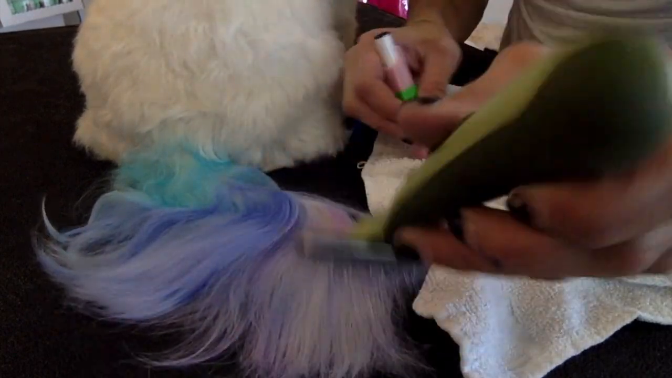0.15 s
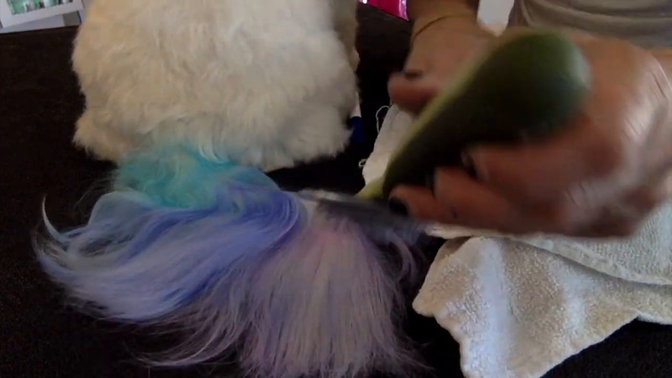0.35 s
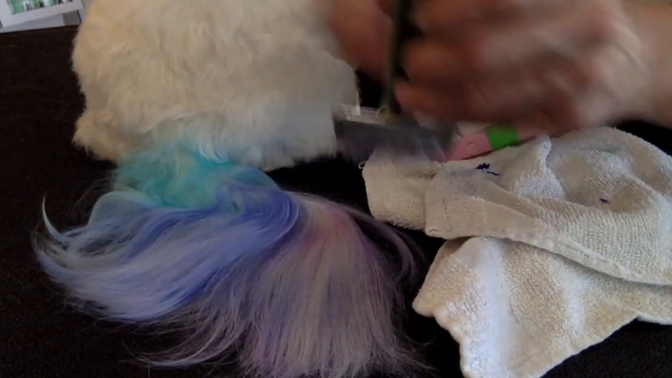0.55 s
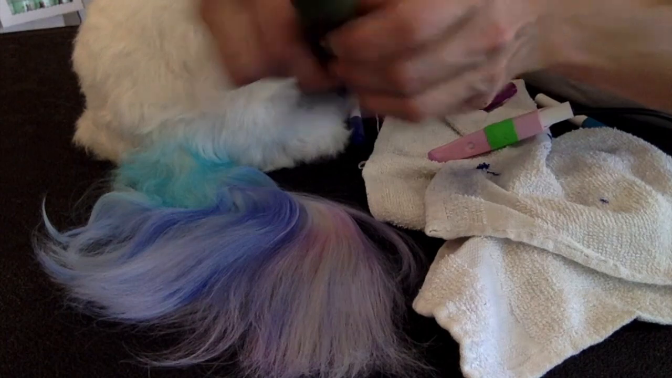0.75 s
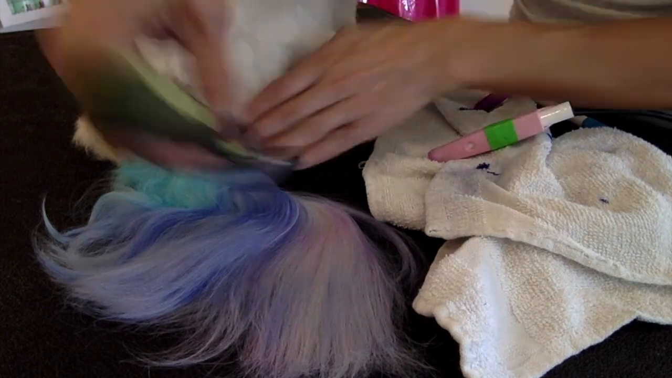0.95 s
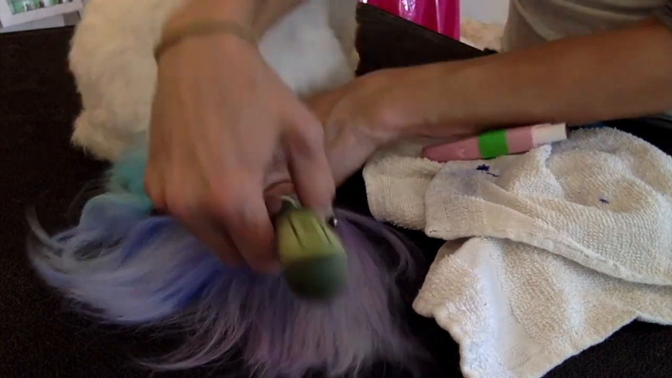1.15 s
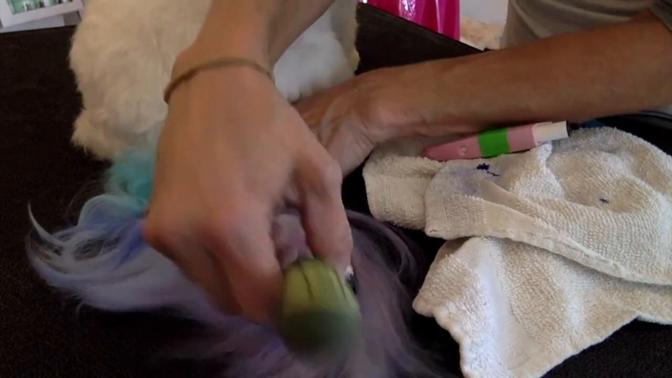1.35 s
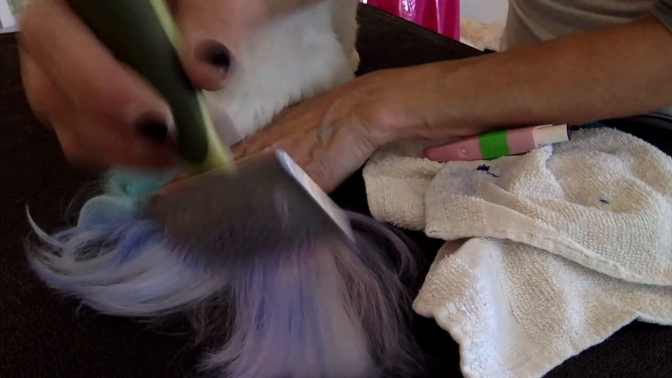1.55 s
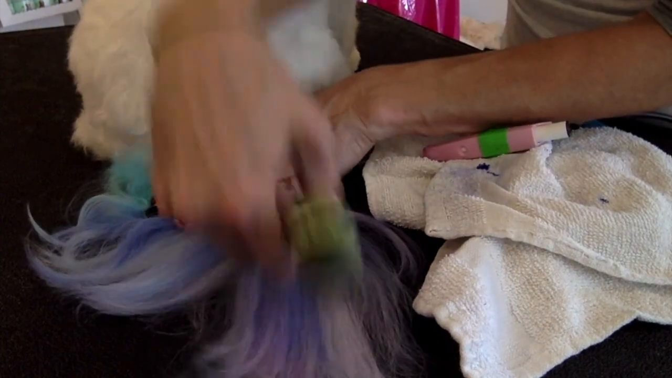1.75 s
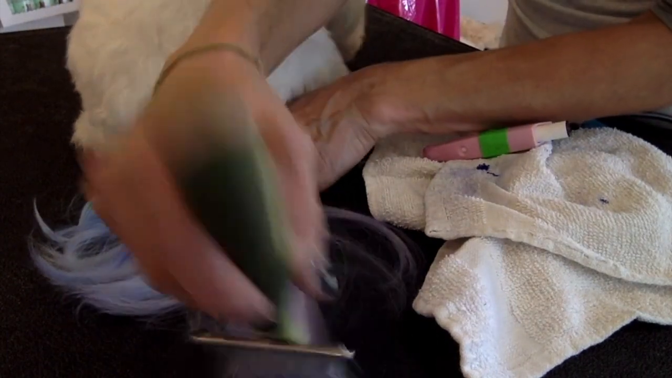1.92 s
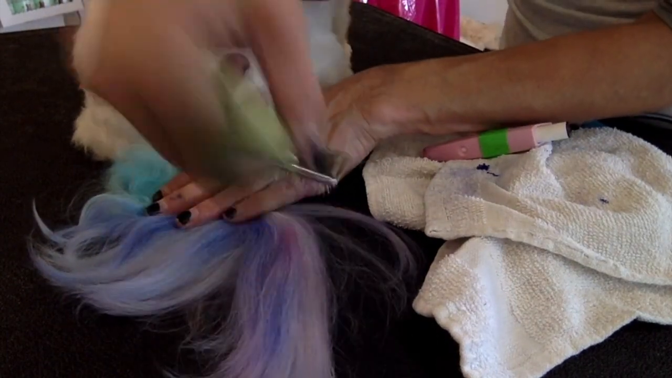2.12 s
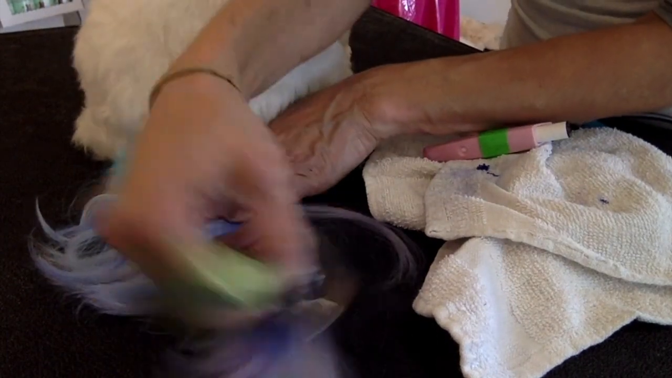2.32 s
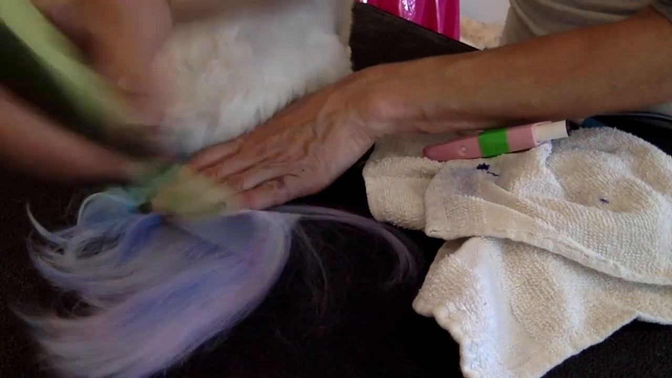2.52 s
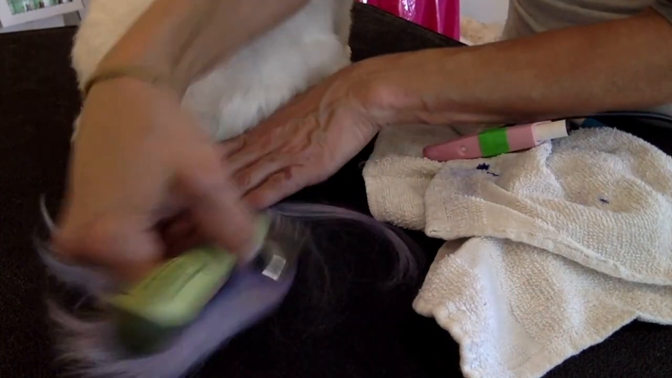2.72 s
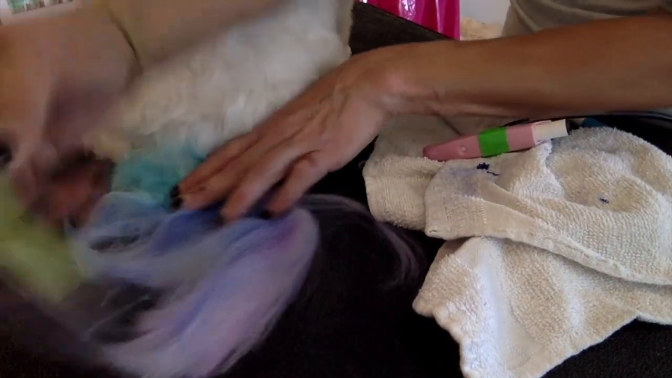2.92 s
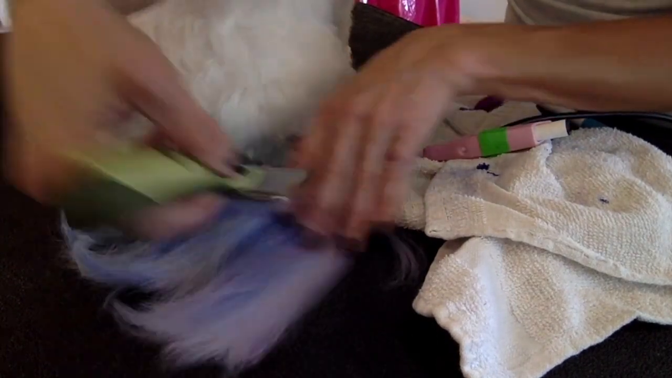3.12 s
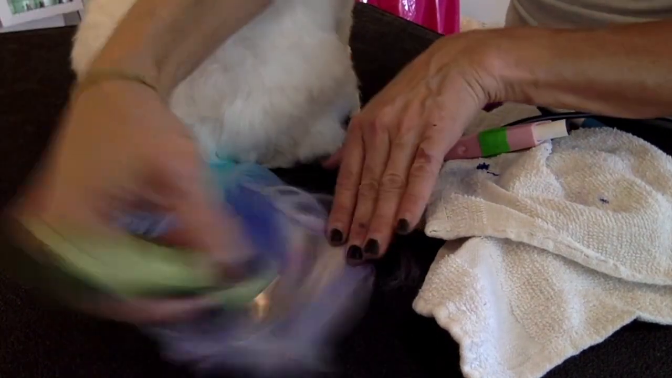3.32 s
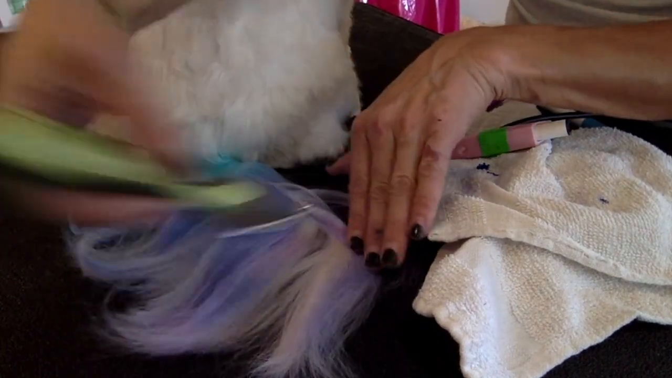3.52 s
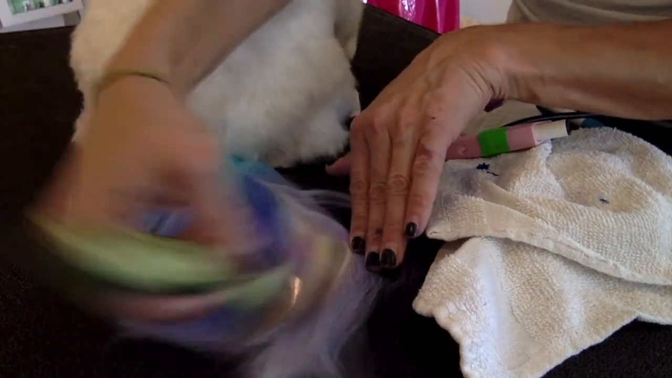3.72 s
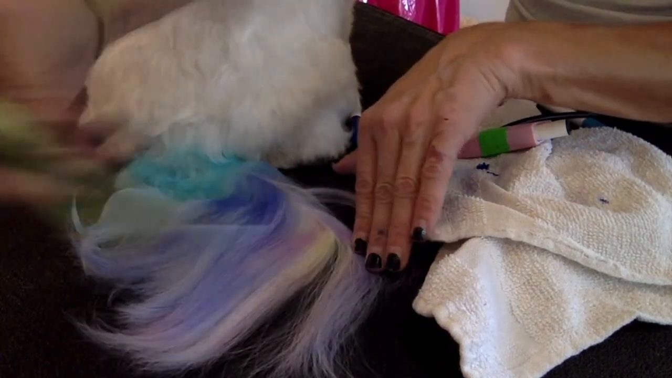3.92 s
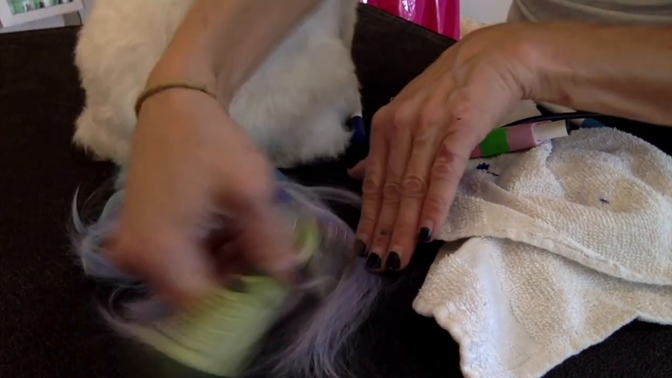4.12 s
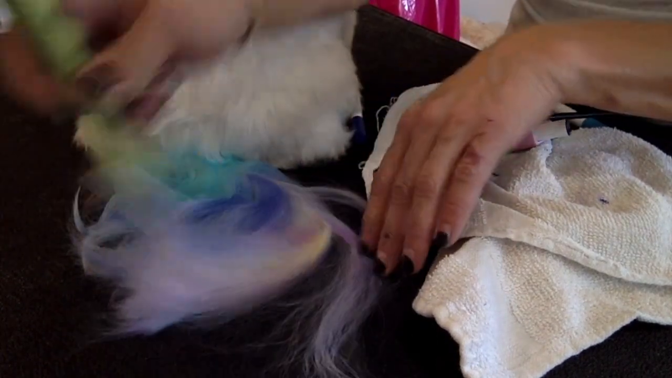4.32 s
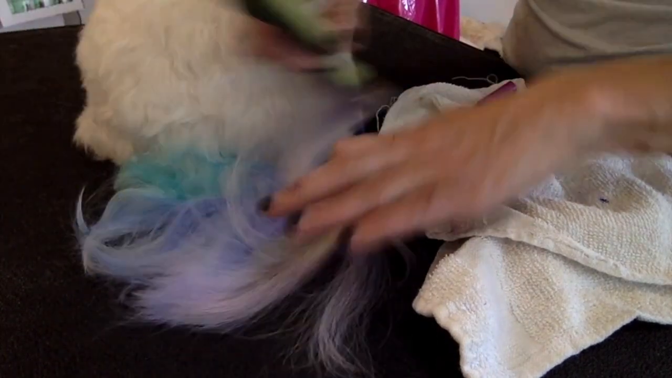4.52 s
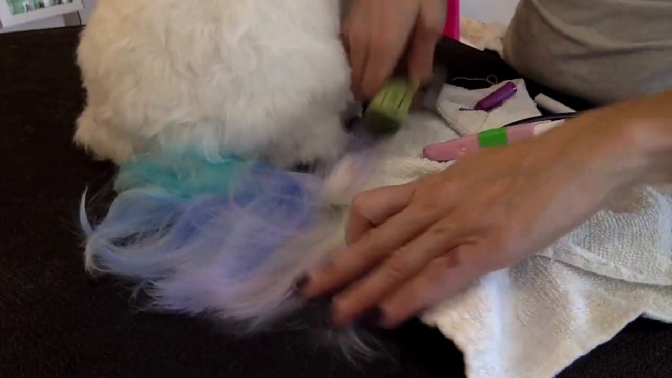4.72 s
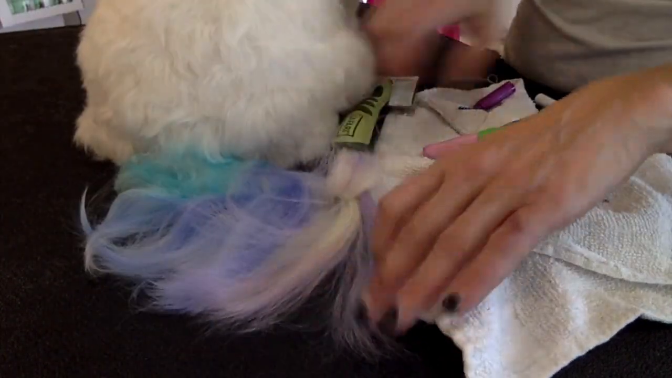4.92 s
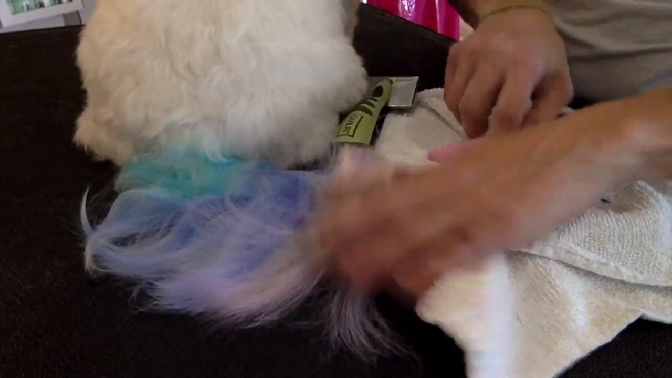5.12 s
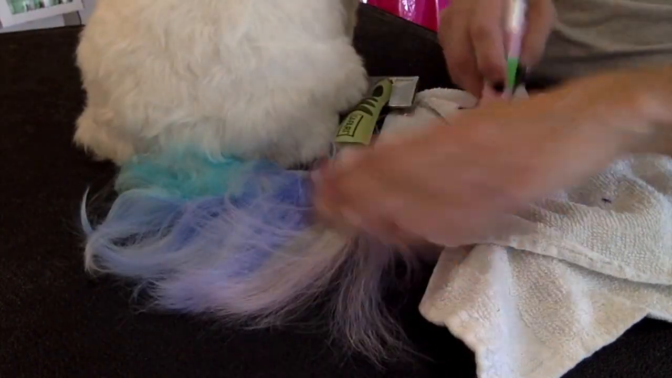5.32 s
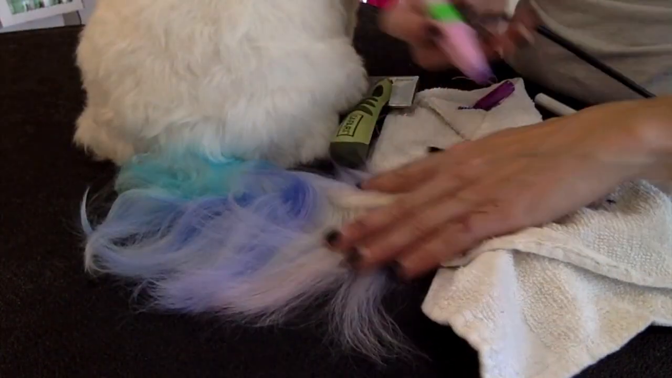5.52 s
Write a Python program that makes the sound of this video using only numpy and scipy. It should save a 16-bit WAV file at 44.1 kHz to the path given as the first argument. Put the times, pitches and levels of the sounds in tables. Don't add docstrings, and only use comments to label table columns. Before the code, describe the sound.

Seven short, crisp brush strokes hiss through long silky hair in a small room over a faint low motor hum, then faint tool scuffs.

```python
import sys
import numpy as np
from scipy import signal
from scipy.fft import rfft, irfft, next_fast_len
from scipy.io import wavfile
from scipy.ndimage import uniform_filter1d, map_coordinates

SR = 44100
rng = np.random.default_rng(int(sys.argv[2]) if len(sys.argv) > 2 else 0)


def inscribe(sig):
    pcm = np.round(np.clip(np.atleast_2d(sig).T, -1, 1) * 32767)
    wavfile.write(sys.argv[1], SR, pcm.astype(np.int16))


def boost(x):
    u = np.asarray(x, float) / 20
    return 10 ** u


N = 249341

# pitch_hz, level_db
SLIP = [(1500, -79.5), (2400, -39), (3100, -11), (3800, -1), (4400, -3.5), (5100, -5.5), (6300, -11.5),
        (9000, -33.5)]
# pitch_hz, level_db
SIZZLE = [(2500, -82.5), (4500, -28.5), (6500, -2.5), (8500, 0), (11000, -2), (13500, -1.5), (16000, -3)]
# pitch_hz, width_hz, level_db
DRAG = [(2320, 1600, -2), (2770, 850, 1)]
# pitch_hz, width_hz, level_db
PAD = [(748, 540, -7), (1084, 250, 3.5), (1600, 440, 1.5)]


def brush():
    level_db, sizzle_db, drag_db, pad_db, stiffness = stroking()
    touch, touch_sizzle = touchdowns()
    slip = boost(level_db) + touch
    sizzle = boost(level_db + sizzle_db) + touch_sizzle

    rub = slips(share=0.3, spread_db=2.2, clump_db=0.9, clump_rate=280)
    rub = patchy(rub, depth_db=2.1)
    soft = unit(filtered(rub, lambda hz: boost(along(SLIP, hz / 0.87))))
    hard = unit(filtered(rub, lambda hz: boost(along(SLIP, hz / 1.13))))
    blend = np.pi / 2 * np.clip(stiffness, 0, 1)
    pins = 0.67 * slip * (np.cos(blend) * soft + np.sin(blend) * hard)
    tips = sizzle * unit(filtered(rub, lambda hz: boost(along(SIZZLE, hz))))
    drag = boost(level_db + drag_db) * unit(filtered(rub, lambda hz: resonances(DRAG)(hz) ** 2))

    thuds = slips(share=0.01, spread_db=2.5, clump_db=1.0, clump_rate=90)
    thuds = patchy(thuds, depth_db=2.5)
    pad = boost(level_db + pad_db) * unit(filtered(thuds, lambda hz: resonances(PAD)(hz) ** 2))
    direct = pins + tips + drag + pad

    late = SR * 0.0002262 * (1 + 0.03 * wobble(9))
    reflected = map_coordinates(direct, [np.arange(N) - late])
    return 0.99 * (direct + 0.42 * reflected), direct


# time_s, slip_level_db
STROKES = [
    [(1.324, -40.5), (1.392, -31.5), (1.444, -30.5), (1.474, -34.5)],
    [(1.869, -34), (1.921, -26), (1.959, -26.5), (1.974, -32.5)],
    [(2.336, -30.5), (2.382, -28), (2.432, -26), (2.44, -31.5)],
    [(2.782, -36.5), (2.816, -33), (2.856, -24.5), (2.878, -29)],
    [(3.345, -32), (3.381, -29), (3.41, -28.5), (3.424, -29)],
    [(3.733, -34), (3.777, -28.5), (3.831, -24.5), (3.86, -38.5)],
    [(4.183, -36), (4.191, -36), (4.255, -24), (4.272, -25.5)],
]
# landing_to_bite_s, first_hairs_db (relative to bite), pin_stiffness (0-1)
LANDINGS = [(0.033, -22.5, 0.58), (.016, -17.5, .55), (0.018, -16.5, .58), (.01, -15.5, 0.55),
            (0.018, -20.5, 0.45), (.008, -17, .62), (0.0092, -10, .62)]
# pins_sink_s, deep_drag_db (relative to slip), pad_seats_s, pad_knock_db,
# thin_pin_sizzle_db (relative to slip)
GRIPS = [(.13, -7, 0.065, -60.5, 2), (0.062, -8.5, .04, -51.5, 1), (0.041, -10, 0.046, -43.5, 2),
         (0.048, -9.5, .05, -45.5, 2), (.04, -10, 0.021, -45, 3), (0.034, -9.5, 0.04, -43.5, 1),
         (.07, -10, 0.019, -43, 0.5)]


def stroking():
    lift_s, lift_dull_db = 0.015, -4
    shallow_db = -16.5
    unseated_db, pad_sag_db_per_s = -18.5, -70
    pad_follows = 0.3
    stiff_per_db = 0.03
    unloaded, load_s = 0.4, 0.025

    t = np.arange(N) / SR
    arriving = [[(stroke[0][0] - lead, stroke[0][1] + db), *stroke]
                for stroke, (lead, db, _) in zip(STROKES, LANDINGS)]
    level_db = level_curve(arriving, fade_s=0.02)

    bite = np.array([stroke[0][0] for stroke in STROKES])
    lift, lift_db = np.transpose([stroke[-1] for stroke in STROKES])
    k = np.clip(np.searchsorted(lift + 0.1, t), 0, len(lift) - 1)
    sink, deep_db, seat, knock_db, thin_db = np.transpose(GRIPS)[:, k]
    age, left = t - bite[k], lift[k] - t

    sizzle_db = thin_db + lift_dull_db * np.clip(1 - left / lift_s, 0, 1)
    drag_db = deep_db + shallow_db * np.clip(1 - age / sink, 0, 1)
    held_db = np.where(left > 0, np.maximum(level_db, -45), lift_db[k])
    pad_db = knock_db - held_db + pad_follows * (held_db + 30)
    pad_db += unseated_db * np.clip(1 - age / seat, 0, 1)
    pad_db += pad_sag_db_per_s * np.clip(age - seat, 0, 1)
    stiffness = np.transpose(LANDINGS)[2][k] + stiff_per_db * (held_db + 28.5)
    stiffness += unloaded * np.clip(0.5 - age / load_s, 0, 1)
    return level_db, sizzle_db, drag_db, pad_db, stiffness


# start_s, peak_db, sizzle_db (relative to
# peak), length_s
TOUCHES = [(1.301, -49, 7.5, 0.0016), (1.302, -47, 3, .002), (1.31, -34, 6.5, 0.0023),
           (1.316, -31, -0.5, 0.0027), (1.8274, -20.5, -11, 0.002), (1.833, -39, 3.5, 0.0051),
           (2.2933, -26, -11, 0.0034), (2.299, -35.5, -1.5, 0.012), (2.777, -41.5, -10.5, 0.0039),
           (3.708, -28.5, -4.5, 0.0062), (4.127, -29.5, 2.5, 0.0035), (4.134, -28, -0.5, 0.0057),
           (4.139, -29, 0.5, 0.0053), (4.148, -40, -2, 0.0052), (4.157, -46, 5, 0.005),
           (4.451, -53.5, -21, 0.031)]


def touchdowns():
    t = np.arange(N) / SR
    slip, sizzle = np.zeros(N), np.zeros(N)
    for start, db, sizzle_db, length in TOUCHES:
        age = np.clip((t - start) / length, 0, 40)
        burst = boost(db - 10.5) * (1 - np.exp(-25 * age)) * np.exp(-age ** 2)
        slip += burst
        sizzle += boost(sizzle_db) * burst
    return slip, sizzle


def slips(share, spread_db, clump_db, clump_rate):
    hit = rng.random(N) < share
    size = boost(spread_db * np.minimum(rng.exponential(size=N), 4))
    clicks = hit * size * rng.choice([-1, 1], N)
    return boost(clump_db * wobble(clump_rate)) * (unit(clicks) + 0.68 * rng.standard_normal(N))


def patchy(x, depth_db):
    z = signal.stft(x, nperseg=256)[2]
    field = uniform_filter1d(rng.standard_normal(z.shape), size=2, axis=0)
    field = uniform_filter1d(field, size=9, axis=1)
    return signal.istft(z * boost(depth_db * unit(field)), nperseg=256)[1][:N]


# loudest_s, level_db, swell_s, fade_s
HANDLING = [
    [(4.884, -67, .006, .01)],
    [(4.882, -70, 0.0069, .01)],
    [(4.81, -80, .01, .03), (4.855, -72, .02, 0.042)],
    [(4.898, -67, .003, 0.0054), (4.919, -59, .005, .007), (4.933, -56.5, .004, 0.015)],
    [(4.898, -67, .003, 0.0056), (4.919, -57, 0.0067, .008), (4.932, -59, .004, .006),
     (4.95, -66, 0.0078, 0.011)],
    [(4.919, -74, .005, .007), (4.933, -74, .004, .012)],
    [(5.24, -61, .006, 0.0089), (5.264, -58.5, 0.01, .02)],
    [(5.232, -68, .003, 0.042)],
    [(5.231, -51, 0.0018, 0.011), (5.245, -60.5, .005, 0.033)],
]
# pitch_hz, width_hz, level_db
CREAKS = [
    [[(4200, 1100, 0)], [(8500, 800, 0)], [(13320, 800, 0)]],
    [[(3690, 300, 1), (5630, 900, -7)], [(7600, 710, 2), (8600, 480, 3)], [(12460, 5600, 0)]],
    [[(3880, 710, 0), (4980, 500, 2)], [(8270, 2000, 0)], [(12900, 2200, 0), (15300, 1000, -4)]],
]
# start_s, level_db, pitch_hz, time_to_fade_60_db_s
PINGS = [
    (.288, -65, 6700, .03),
    (1.2, -74, 7450, .03),
    (4.934, -51, 1600, 0.033),
]


def handling():
    out, t = np.zeros(N), np.arange(N) / SR
    grains = slips(share=0.06, spread_db=3, clump_db=2, clump_rate=150)
    grains = patchy(grains, depth_db=2.5)
    for scuffs, modes in zip(HANDLING, sum(CREAKS, [])):
        level = np.zeros(N)
        for loudest, db, swell, fade in scuffs:
            distance = np.maximum((loudest - t) / swell, (t - loudest) / fade)
            level += boost(db) * np.exp(-distance ** 2)
        out += level * unit(filtered(grains, lambda hz: resonances(modes)(hz) ** 2))
    for start, db, hz, t60 in PINGS:
        age = np.clip(t - start, 0, 1)
        out += boost(db - 60 * age / t60) * np.sin(2 * np.pi * hz * age)
    return out


# pitch_hz, time_to_fade_60_db_s
ROOM = [(1000, 0.24), (3000, 0.38), (6000, 0.47), (10000, 0.46), (15000, 0.3)]
# pitch_hz, level_db
WALLS = [(1000, 6.5), (3000, 4), (6500, 2), (11000, 0), (15000, -0.5)]
# pitch_hz, level_db (per frequency bin)
GATE = [(1000, -105), (4000, -98), (8000, -93), (12000, -84.5), (15000, -80)]


def room(x):
    hz, t, z = signal.stft(rng.standard_normal(SR // 2), SR, nperseg=256)
    hz = hz[:, None]
    tail_db = along(WALLS, hz) - 60 * t / along(ROOM, hz)
    tail_db -= hz / 2500 * (t / 0.086) ** 2
    tail = signal.istft(z * boost(tail_db), SR, nperseg=256)[1]
    delayed = np.pad(x, (200, 0))
    wet = boost(-15.5) * signal.fftconvolve(delayed, tail / np.linalg.norm(tail))[:N]

    hz, t, z = signal.stft(wet, SR, nperseg=512)
    hz = hz[:, None]
    power = uniform_filter1d(np.abs(z) ** 2, size=4, axis=0)
    power = np.abs(uniform_filter1d(power, size=4, axis=1)) + 1e-20
    floor = boost(-6 - hz / 900)
    kept = np.clip(1 - boost(2 * along(GATE, hz)) / power, floor, 1)
    return signal.istft(z * kept, SR, nperseg=512)[1][:N]


# time_s, level_db
OPENING = [
    (0.0, -56.5),
    (0.68, -63.5),
    (1.3, -62.5),
    (1.38, -56),
    (2.94, -55.5),
    (3.299, -57.5),
    (3.55, -55.5),
    (4.39, -55),
    (4.66, -58),
    (5.65, -61.5),
]
# pitch_hz, level_db
AIR = [(45, -33.5), (70, -20), (95, -17.5), (125, -6.5), (190, -8.5), (270, -2), (330, -9), (520, -10.5),
       (700, -10.5), (1300, -15), (1950, -17.5), (2300, -22), (3100, -51)]
# pitch_hz, level_db
HISS = [(1800, -14.5), (2200, 3), (2700, 3), (3300, -2), (4900, 0), (5700, -9.5), (7200, -12),
        (8900, -11.5), (10300, -16.5), (12500, -18.5), (14000, -13), (14800, -21.5), (15500, -40.5)]
# multiple_of_shaft_speed, level_db
MOTOR = [(1, -18), (2, -12), (3, -3), (4, -11), (7, -3), (9, -10.5), (11, -14), (14, -19.5), (19, -16.5),
         (21, -15.5), (24, -14.5), (26, -19.5), (29, -17.5), (32, -15)]
# pitch_hz, level_db
FAN = [(132, -9.5), (264, -13), (667, -18)]


def background():
    t = np.arange(N) / SR
    air = unit(filtered(rng.standard_normal(N), lambda hz: boost(along(AIR, hz))))
    grain = patchy(rng.standard_normal(N), depth_db=2.5)
    hiss = unit(filtered(grain, lambda hz: boost(along(HISS, hz))))
    shaft_hz = 57.7
    turn = 2 * np.pi * shaft_hz * t + 0.018 * wobble(4.7)
    motor, fan = np.zeros(N), np.zeros(N)
    for k, db in MOTOR:
        motor += boost(db + 0.74 * wobble(9.5)) * np.sin(k * turn + 6 * rng.random())
    for hz, db in FAN:
        fan += boost(db + 3 * wobble(12)) * np.sin(2 * np.pi * hz * t + 0.9 * wobble(14))
    whine = boost(-99.0 + 4 * wobble(20)) * np.sin(2 * np.pi * 12400 * t + 2.3 * wobble(60))

    time_s, db = np.transpose(OPENING)
    opening_db = np.interp(t, time_s, db) + 0.15 * wobble(3.2)
    hum = boost(opening_db) * (boost(-2.0) * air + motor + fan)
    hiss_db = 0.96 * (opening_db + 58.5) - 71.5
    return hum + boost(hiss_db) * hiss + whine


def unit(x):
    return x / np.sqrt(np.mean(x ** 2) + 1e-20)


def along(points, hz):
    f, v = np.transpose(points)
    return np.interp(np.log(hz + 1), np.log(f + 1), v)


def level_curve(tables, fade_s):
    rows = []
    for table in tables:
        (start, first_db), (end, last_db) = table[0], table[-1]
        rows += [(start - fade_s / 2, first_db - 60), *table, (end + fade_s, last_db - 60)]
    time_s, db = np.transpose(rows)
    return np.interp(np.arange(N) / SR, time_s, db)


def wobble(rate):
    return map_coordinates(rng.standard_normal(int(N * rate / SR) + 4), [np.arange(N) * rate / SR])


def filtered(x, response):
    m = next_fast_len(N + SR // 2)
    return irfft(rfft(x, m) * response(np.fft.rfftfreq(m, 1 / SR)), m)[..., :N]


def resonances(modes):
    def response(hz):
        total = 0
        for k, (centre, width, db) in enumerate(modes):
            damping = 1j * hz * width
            total = total + (-1) ** k * boost(db) * damping / (centre ** 2 - hz ** 2 + damping)
        return total
    return response


def scene():
    near, direct = brush()
    tools = handling()
    return (near + tools + room(direct + tools) + background())[None]


def low_pass(x):
    return signal.sosfilt(signal.butter(12, 16690, fs=SR, output="sos"), x)


def record(dry):
    def recorder_response(hz):
        treble = boost(-30 * np.clip((hz - 15880) / 120, 0, 1.5))
        bass = hz ** 4 / (hz ** 4 + 48 ** 4)
        return treble * bass
    mix = filtered(dry, recorder_response)
    return low_pass(mix)


dry = scene()
out = record(dry)
inscribe(out)
```